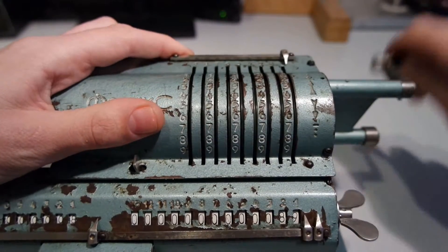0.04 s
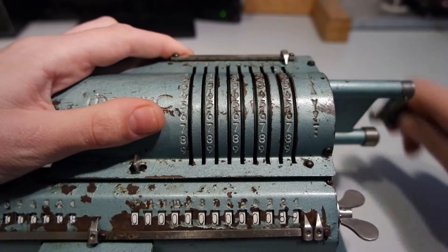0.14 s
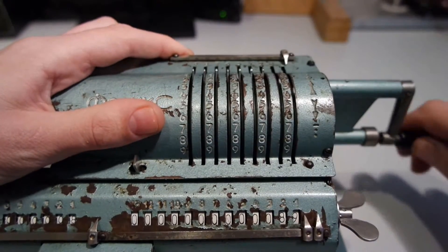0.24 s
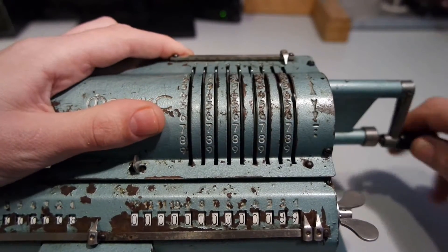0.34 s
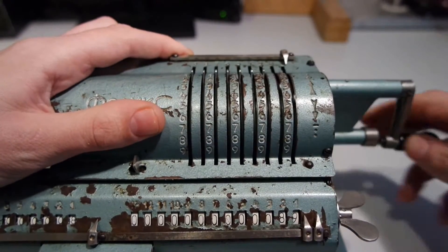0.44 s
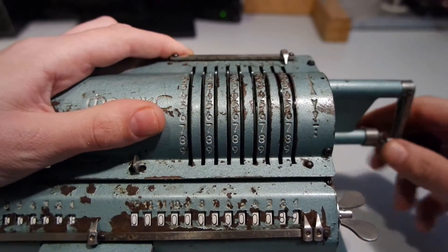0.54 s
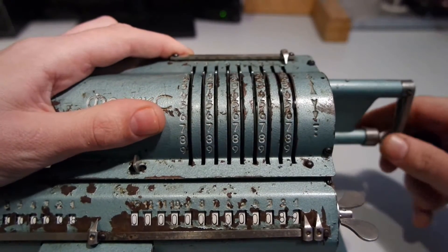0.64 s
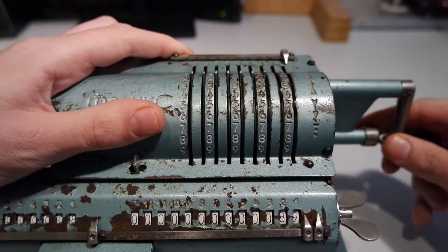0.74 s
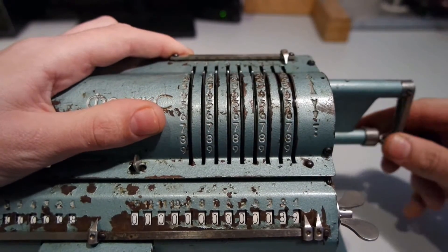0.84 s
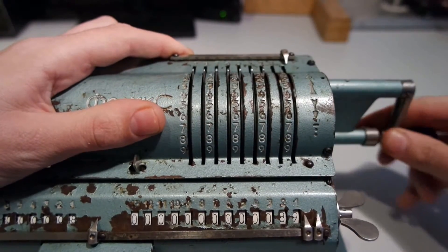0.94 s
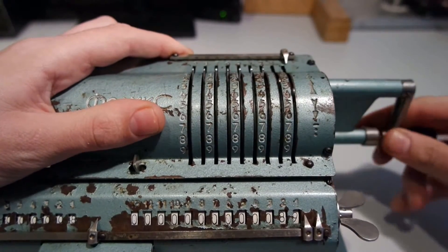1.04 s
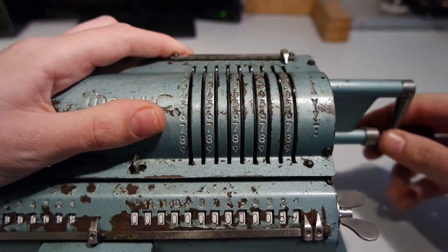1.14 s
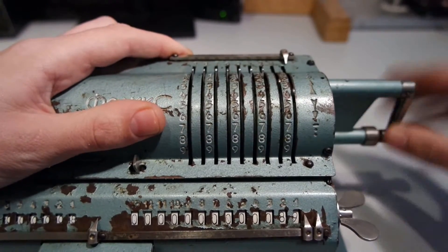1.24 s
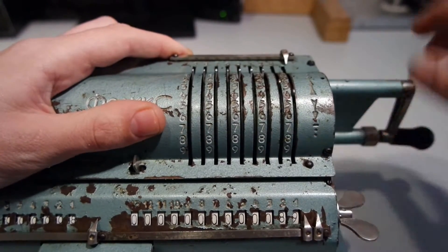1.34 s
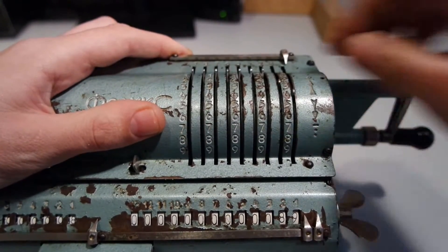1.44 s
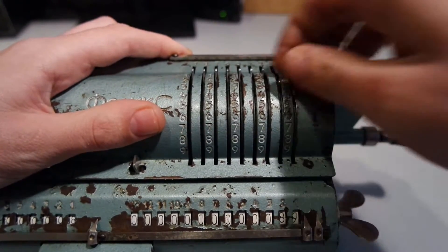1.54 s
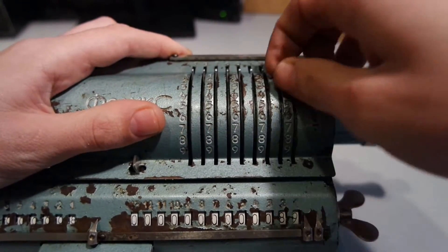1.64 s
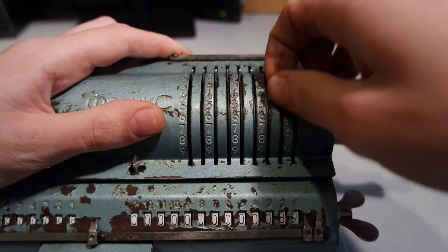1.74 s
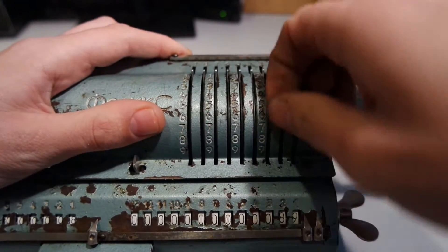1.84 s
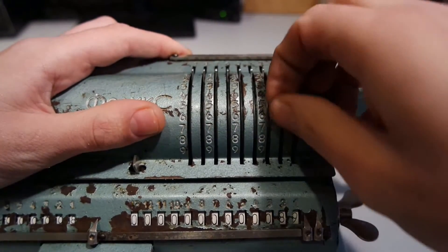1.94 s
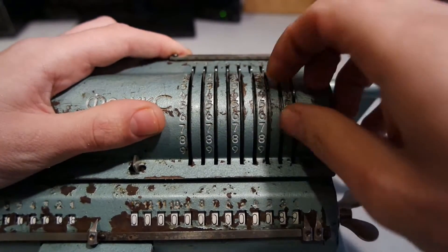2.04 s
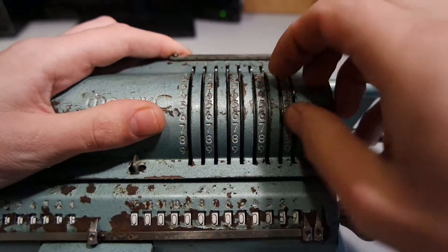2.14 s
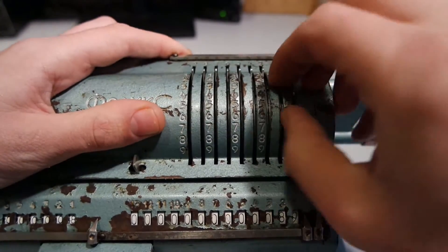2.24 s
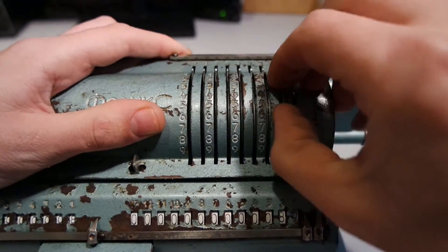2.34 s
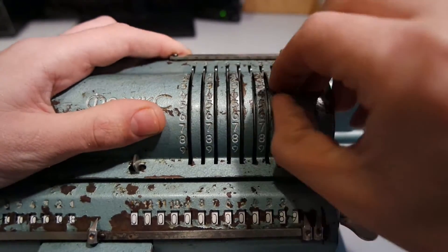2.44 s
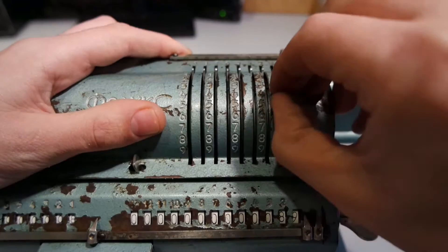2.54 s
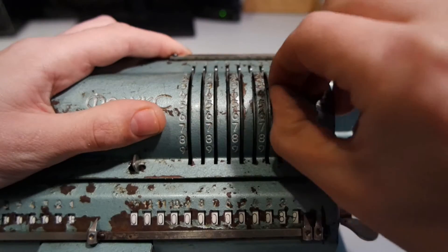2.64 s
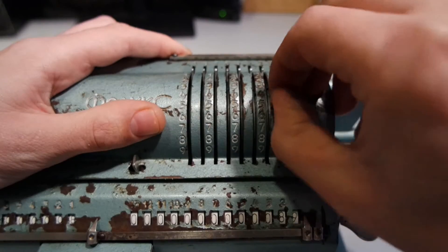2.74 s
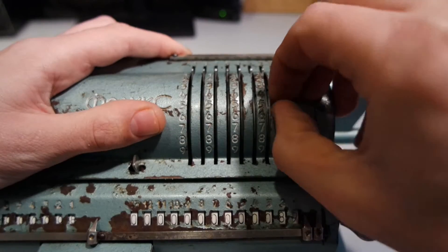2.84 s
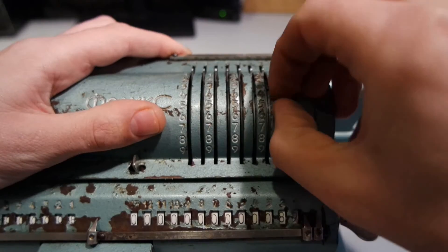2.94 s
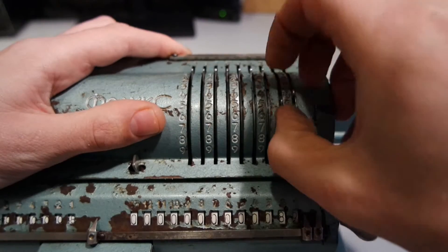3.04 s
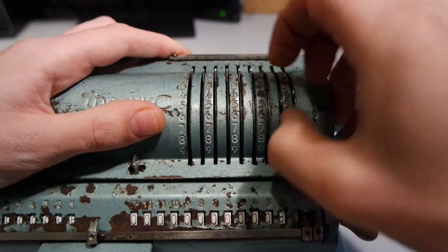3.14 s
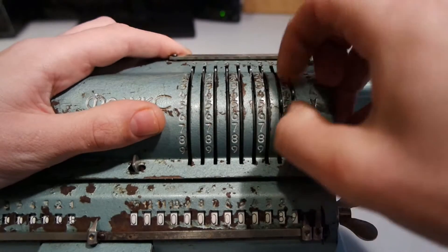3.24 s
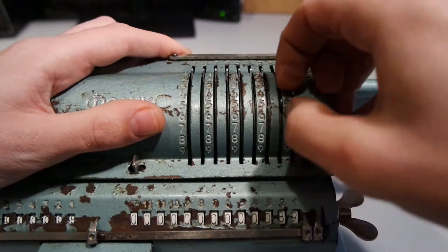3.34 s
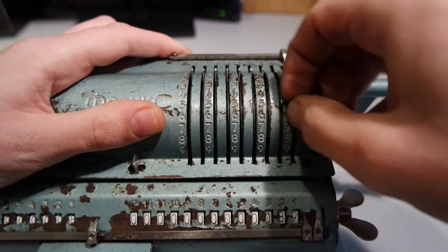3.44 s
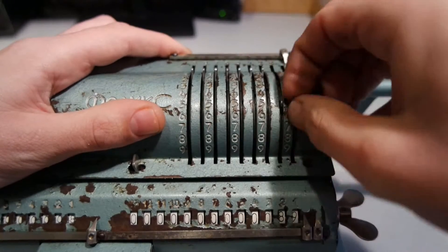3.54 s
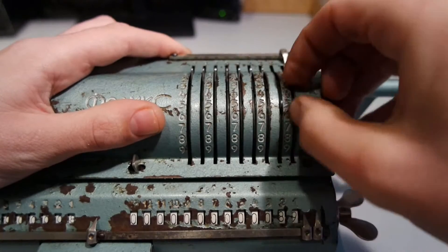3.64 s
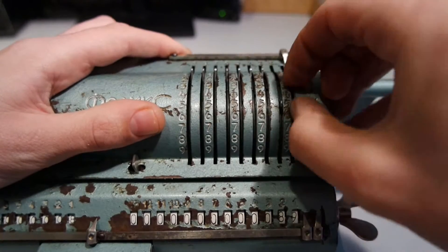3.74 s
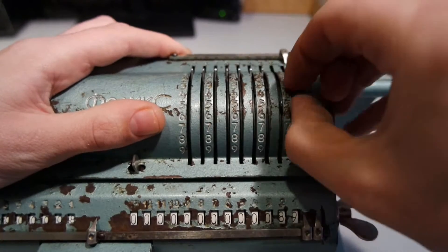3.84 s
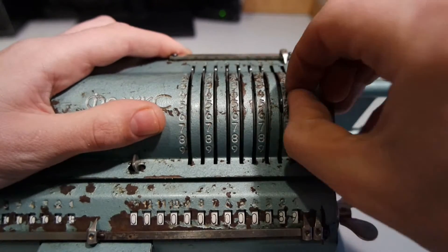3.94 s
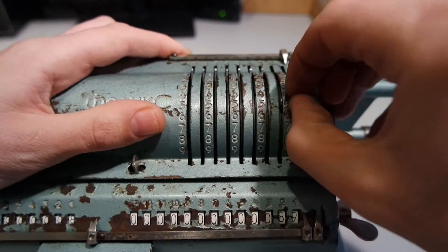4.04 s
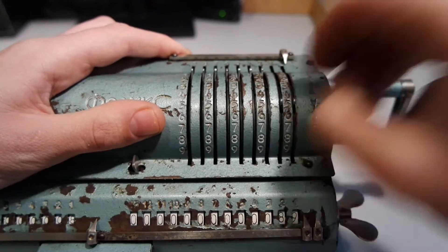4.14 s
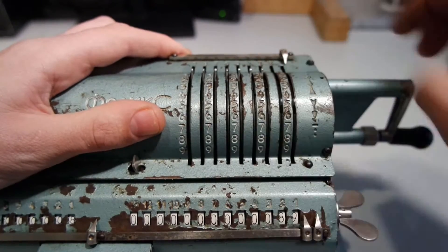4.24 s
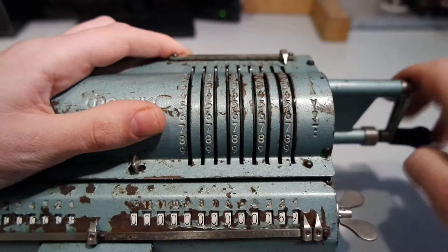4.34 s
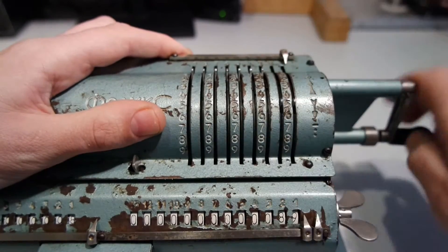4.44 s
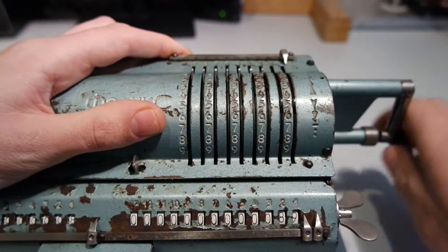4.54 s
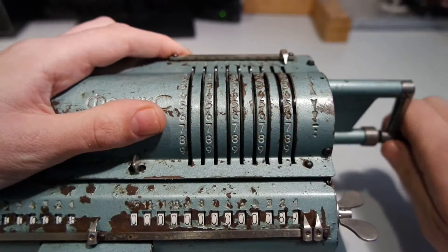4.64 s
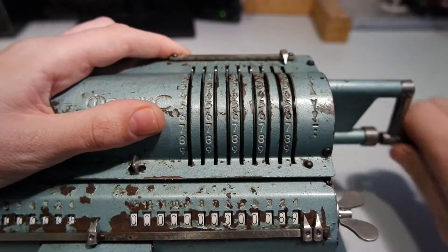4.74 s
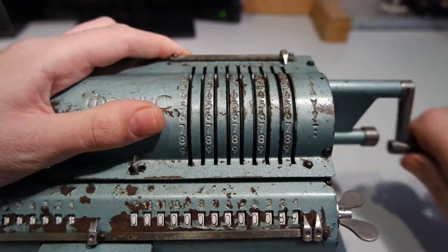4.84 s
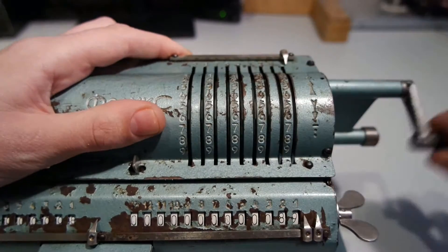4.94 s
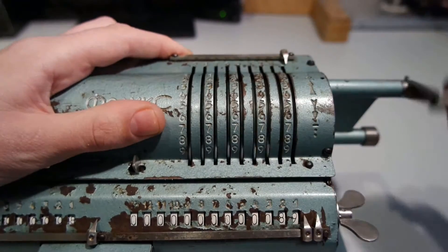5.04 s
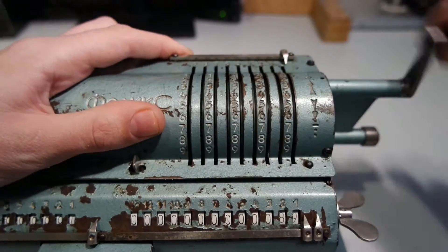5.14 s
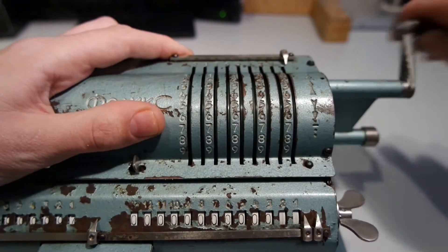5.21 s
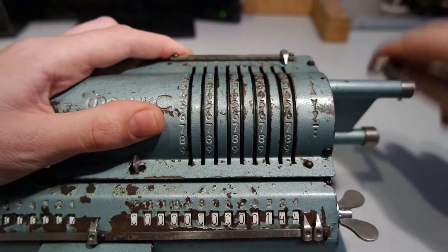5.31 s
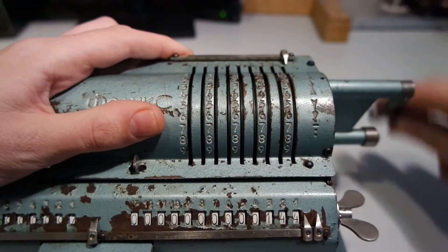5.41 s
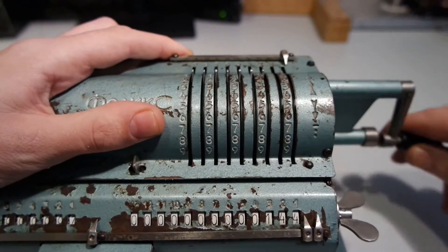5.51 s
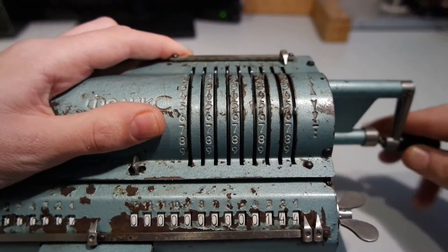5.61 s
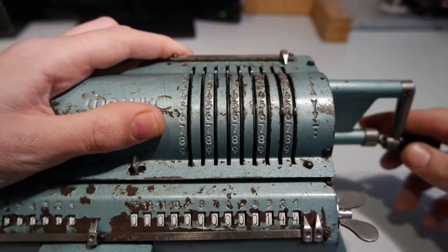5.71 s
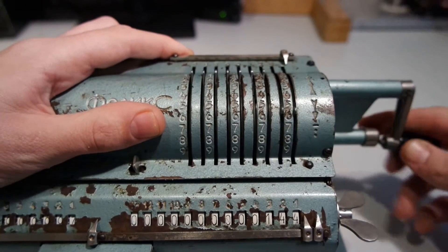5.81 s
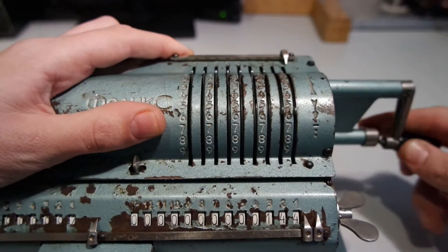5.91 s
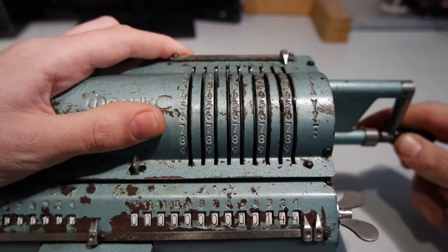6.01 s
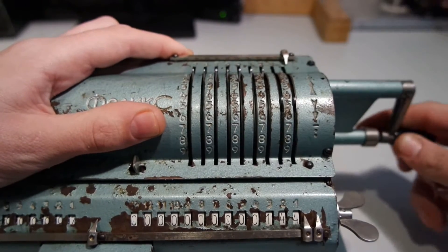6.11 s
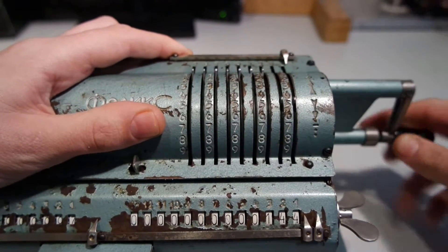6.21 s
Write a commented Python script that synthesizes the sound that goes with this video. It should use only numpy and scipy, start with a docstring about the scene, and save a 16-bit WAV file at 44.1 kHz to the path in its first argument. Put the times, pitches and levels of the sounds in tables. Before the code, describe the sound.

A hand-cranked metal calculator rattles in dense bursts of sharp ratchety snaps, with sparse faint lever clicks between, close up in a quiet room.

```python
"""A hand-cranked pinwheel calculator on a desk, close to a small microphone in a quiet room.
A dense flurry of snaps opens, a second follows at 1.05 s, then sparse, mostly faint clicks.
A hard snap lands at 4.48 s, the longest rattle runs from 5.29 s; a faint squeak and last snaps close.
Each snap is a noise chatter that rings casing modes, steel, tick and desk filters; pushes shake
the desk and noise grains rub throughout, over a thin whine, room tone and hiss."""
import sys
import numpy as np
from scipy import signal
from scipy.io import wavfile
from scipy.ndimage import uniform_filter1d

SR = 44100
rng = np.random.default_rng(int(sys.argv[2]) if len(sys.argv) > 2 else 0)


def unload_audio(sound):
    """Save the sound as a 16-bit wav file, at the path given as the first command line argument."""
    columns = np.transpose(np.atleast_2d(sound))
    # keep every value between -1 and 1, then stretch to whole-number steps
    steps = np.round(np.clip(columns, -1, 1) * 32767)
    wavfile.write(sys.argv[1], SR, steps.astype(np.int16))


N = 276507

# Mechanism snaps. Each row: start in seconds, then chatter levels over the first 10 ms, before filtering:
# high casing modes in dB, low casing modes in dB, steel in dB, bright tick in dB, desk knock in dB;
# pitch favoured among the casing modes in Hz, chatter time in ms before each part's stretch.
SNAPS = [(0.0095, -42, -46.5, -35.5, -46, -50.5, 3600, 3.5),
         (0.0132, -41, -51, -33.0, -30, -58, 3750.0, 3.2), (0.0635, -33, -40, -44, -33, -37, 2080, 4.1),
         (0.0808, -33, -48, -31.5, -23.5, -59, 3060, 3.3), (0.103, -34.5, -40, -33, -21, -46, 3020, 3.5),
         (0.1205, -32.5, -56.0, -33.0, -24, -54, 3060, 9.6),
         (0.1453, -33.5, -51, -32, -26.5, -58.5, 2130, 6.1),
         (0.2216, -58, -49, -67.5, -61, -52.0, 1090.0, 9.9),
         (0.2385, -48, -47, -53, -58.0, -47, 1000.0, 9.0),
         (0.2517, -48, -48.5, -62, -64.0, -50, 2060.0, 2.6),
         (0.2666, -53, -53, -52.5, -48.5, -50, 3900, 3.7), (0.437, -42, -55, -68, -38, -65, 2220, 4.9),
         (0.504, -74.5, -65, -65, -58, -60, 1280, 6.4), (0.6116, -47.5, -47.5, -57, -68, -52, 1800, 6),
         (0.637, -51.5, -53.5, -69, -78, -65, 1030, 3.3), (0.732, -59, -68, -76, -81, -75, 2160, 4),
         (0.7741, -66.0, -71, -60.5, -67, -70, 3730, 6.9), (1.054, -62, -64, -72.5, -74.0, -59.5, 2260, 12),
         (1.0808, -53.5, -54, -72, -54, -50.5, 2070, 3.8), (1.0885, -35, -38.5, -37, -35, -48, 2840, 3.2),
         (1.0976, -37.5, -41, -38.0, -27, -43.5, 2090, 3.4),
         (1.109, -48, -42, -57, -45.5, -55, 1870.0, 2.1), (1.1163, -63, -49, -63, -53, -49, 1960, 14),
         (1.1713, -46, -49, -38, -42, -60, 2800, 3.2), (1.177, -41.5, -57.5, -47, -36.5, -38, 2900, 3.1),
         (1.239, -53, -49.5, -67, -73, -67, 2090.0, 4.6),
         (1.2645, -57, -58.0, -68, -76.0, -69, 2820.0, 4.6),
         (1.3587, -61, -66.5, -59, -66, -74, 2020.0, 5.1),
         (1.4182, -72.0, -57, -68, -68, -57.5, 1170.0, 11),
         (1.436, -67.5, -63, -66, -61, -61.5, 1210.0, 8.3),
         (1.6615, -60.5, -76.5, -69, -64.5, -77, 2330.0, 4.6), (1.717, -76, -62, -79, -82, -71, 1040, 9.9),
         (1.846, -47.5, -42, -47, -52, -47.5, 980, 6.2),
         (1.905, -71, -64.0, -69.5, -66.0, -68, 1070.0, 8.1),
         (1.918, -62, -66.0, -68.5, -61.5, -66.5, 1090.0, 7.6),
         (1.9412, -63, -71, -65.0, -61, -71, 3850.0, 7.9),
         (1.9522, -62, -67.0, -69.5, -65, -68, 1060.0, 9.0),
         (1.9799, -62.5, -62, -65.5, -62, -69.5, 910.0, 4.4),
         (2.049, -61, -65, -55, -57.5, -64, 3470.0, 3.5), (2.0576, -77, -78.5, -63, -64, -71, 3440.0, 10),
         (2.5256, -50, -55, -58, -59.5, -52.5, 2790, 5.8),
         (2.8959, -69.5, -64.5, -82, -77, -67.5, 1040.0, 13),
         (2.912, -81.5, -79.0, -81.5, -85.5, -77, 980.0, 9.0),
         (2.9323, -76, -68.5, -84, -74, -87.5, 1070, 9.0),
         (3.335, -74, -91.5, -81.5, -81, -87, 3460.0, 7.9),
         (3.4105, -58.5, -54.5, -69, -68.0, -56, 996, 9.5),
         (3.4265, -63, -68, -87, -73.0, -70.5, 1010.0, 9.0),
         (3.4377, -71, -64, -86, -82.5, -63, 1060.0, 8.5),
         (3.5719, -54, -57.5, -58.5, -49.5, -67.5, 3520, 5.7), (3.744, -65, -65, -71, -75, -78.5, 987, 7.2),
         (4.0325, -64.5, -66.5, -57.5, -62, -74.5, 3800, 11),
         (4.051, -44, -44.5, -48, -47.5, -48.5, 2860, 7.1),
         (4.4766, -31, -35.5, -33, -38.5, -63, 2810, 5.9), (4.6568, -54.5, -61.5, -66, -74, -64, 2280, 6.4),
         (4.792, -68, -79, -70, -71.5, -79, 1940.0, 9.0), (4.8619, -43, -45, -46, -38.5, -47, 3740, 13),
         (4.8764, -40.5, -55, -43, -37, -55, 3440, 7), (5.025, -58.5, -98.0, -60, -62.5, -73, 2880, 9.7),
         (5.0725, -53, -60.5, -66, -72.5, -55, 2640, 2.8), (5.1165, -50, -61, -49, -44, -55.0, 3170, 2.2),
         (5.2374, -68.5, -72, -63, -51.5, -75.5, 900.0, 3.7),
         (5.2887, -35.5, -39.5, -33.5, -30.5, -50, 2070.0, 4.4),
         (5.316, -31.5, -30.5, -34, -31.5, -40.5, 1010, 6.4), (5.3275, -33.5, -51, -57, -47, -43, 2770, 2),
         (5.3363, -33, -46, -27.5, -21.5, -53, 3160, 5.7), (5.3521, -38, -44, -34, -26.5, -49, 3020, 9.7),
         (5.3684, -37.0, -41, -32, -24, -40.5, 3130.0, 4.4),
         (5.3841, -33.5, -49.0, -31.5, -24, -54.0, 2760, 5.6),
         (5.4056, -35, -43, -36, -26.5, -43.5, 3570.0, 5.8),
         (5.4232, -39, -44, -35.5, -29.5, -44.5, 2830, 7),
         (5.4432, -41, -47.5, -37, -30.0, -67, 1370.0, 7.1),
         (5.5094, -47.5, -51.5, -53, -56.5, -47, 1030.0, 5.2),
         (5.539, -47.5, -54, -51, -41.5, -60, 3530.0, 5.8),
         (5.5499, -43, -49.5, -49, -44.5, -42, 3920, 2.3),
         (5.7144, -45.5, -57.5, -56, -43.5, -70, 2870, 3.3), (6.0748, -67, -63, -83, -84, -75, 2850.0, 6.1),
         (6.092, -54.5, -59, -67, -73, -53.5, 2780.0, 3.5), (6.1, -52, -53, -49.5, -51.0, -58, 1050, 9.3),
         (6.137, -53, -62, -65, -48, -71, 2900, 6.7), (6.1486, -32.5, -43.5, -39.5, -36, -63, 2850, 3.6),
         (6.199, -41, -56, -32.5, -23.5, -49.5, 4400, 4.1),
         (6.2042, -36, -52, -35, -26, -66.0, 4340.0, 3.8)]
USUAL_CHATTER_MS = 4
SOFTER_DB_PER_DOUBLING = 7.5  # the first blow weakens as the chatter time doubles
RISE_SHARE = 0.097  # build-up time constant / chatter time


def chatter(lumps, levels_db, stretch, lump_db, blow_db):
    """One sharp blow and a clump of tiny impacts that thins out, then a weak buzz of loose parts."""
    t = np.arange(4000) / SR
    out = np.zeros(N + 4000)
    lump_growth = 1.5 - np.exp(-t / 0.0018)
    grains = rng.standard_normal(lumps.shape) * gain_of(lump_db * lumps * lump_growth)
    for row, level_db, grain in zip(SNAPS, levels_db, grains):
        start_s, chatter_ms = row[0], row[-1]
        attack = gain_of(-5.5) * np.exp(-t / 0.00056)
        clump = np.exp(-t * 1000 / (stretch * chatter_ms))
        buzz = gain_of(-15.5) * np.exp(-t / 0.026)
        rise = 1 - np.exp(-t * 1000 / (RISE_SHARE * chatter_ms))
        burst = grain * (attack + clump + buzz) * rise
        softer_db = SOFTER_DB_PER_DOUBLING * np.log2(chatter_ms / USUAL_CHATTER_MS)
        burst[20] += gain_of(blow_db - softer_db) * np.sign(grain[0])
        first_10_ms = burst[:SR // 100]
        out[round(start_s * SR):][:4000] += gain_of(level_db) * burst / np.std(first_10_ms)
    return out[:N]


def ring(hz, t60_s):
    """Decaying sine of one casing mode, unit energy."""
    t = np.arange(6000) / SR
    taps = gain_of(-60 * t / t60_s) * np.sin(2 * np.pi * hz * t)
    return taps / np.linalg.norm(taps)


# Casing modes. Each row: pitch in Hz, relative level in dB, T60 in seconds.
CASING_MODES = [(986, 8, 0.028), (1039, 3.5, 0.058), (1390, 7, 0.065), (1745, 8.5, 0.025),
                (1800, 2.5, 0.031), (2053, -2, 0.036), (2190, -3.5, 0.019), (2340, -0.5, .03),
                (2807, -1, 0.036), (2916, 1, 0.01), (3161, -4.5, .035), (3456, -3, 0.032),
                (3694, -2, 0.018), (3940, -2, .03), (4380, -3.5, 0.011)]
LOW_HIGH_SPLIT_HZ = 1900
FAVOUR_DB, FAVOUR_WIDTH = 10, .07  # lift near the favoured pitch, reach as a share of pitch
RING_ON_DB = 1.5  # the casing rings on past the first 10 ms


def casing(lumps):
    """The place of the blow decides which modes answer; they share out the level of their group."""
    _, high_db, low_db, _, _, _, favoured_hz, _ = np.transpose(SNAPS)
    hz, mode_db, t60_s = np.transpose(CASING_MODES)
    detune = np.log(favoured_hz / hz[:, None])
    lift_db = FAVOUR_DB * np.exp(-(detune / FAVOUR_WIDTH) ** 2)
    power = gain_of(mode_db[:, None] + lift_db) ** 2
    low = hz < LOW_HIGH_SPLIT_HZ
    out = np.zeros(N)
    for group, group_db in ((low, low_db), (~low, high_db)):
        shares = power[group] / power[group].sum(0)
        for mode_hz, mode_t60_s, share in zip(hz[group], t60_s[group], shares):
            level_db = group_db + RING_ON_DB + 10 * np.log10(share)
            drive = chatter(lumps, level_db, stretch=0.7, lump_db=2.5, blow_db=20)
            out += through(drive, ring(mode_hz, mode_t60_s))
    # the casing sounds nothing below about 700 Hz
    return signal.sosfilt(signal.butter(3, 700, "high", fs=SR, output="sos"), out)


# Spectra of steel chatter, bright tick and desk knock. Each row: frequency in Hz, relative density in dB per Hz.
STEEL_SPECTRUM = [(4200, -6.5), (5000, -3.5), (6500, -4.5), (8000, -5), (9000, -5)]
TICK_SPECTRUM = [(7800, -15.5), (9170, -4), (10300, -5), (11600, -1.5), (13000, 1), (14400, -3.5),
                 (15500, -6)]
KNOCK_SPECTRUM = [(150, -30), (250, -17), (320, -13), (385, 2.5), (470, -8), (600, 1.5), (900, -22)]


def snaps():
    """The chatter rings the casing, rattles the steel, ticks brightly and knocks the desk."""
    _, _, _, steel_db, tick_db, knock_db, _, _ = np.transpose(SNAPS)
    # rebounds, felt by every part
    lumps = evened(uniform_filter1d(rng.standard_normal((len(SNAPS), 4000)), 35, axis=1))
    steel = chatter(lumps, steel_db, stretch=0.93, lump_db=-2, blow_db=8.5)
    tick = chatter(lumps, tick_db, stretch=1.5, lump_db=3.0, blow_db=14)
    knock = chatter(lumps, knock_db, stretch=1.5, lump_db=2.0, blow_db=13.5)
    out = casing(lumps)
    out += through(steel, colour(STEEL_SPECTRUM))
    out += through(tick, colour(TICK_SPECTRUM))
    return out + through(knock, colour(KNOCK_SPECTRUM))


def swells(times_s, levels_db, rise_s, fall_db_per_s):
    """Level curve: each event climbs 20 dB in rise_s, then falls steadily in dB; powers add."""
    step_s = np.arange(0, N / SR, .002)
    since_s = step_s - np.asarray(times_s)[:, None]
    drop_db = np.where(since_s < 0, -since_s * 20 / rise_s, since_s * fall_db_per_s)
    db = np.asarray(levels_db)[:, None] - drop_db
    return np.interp(np.arange(N) / SR, step_s, np.sqrt((gain_of(db) ** 2).sum(0)))


# Pushes of the hands on the machine. Each row: peak time in seconds, desk shake in dB, desk rustle in dB.
HAND_PUSHES = [(0, -44, -53), (0.088, -34.5, -39.5), (.13, -44, -42.5), (.2, -50, -53), (0.259, -43.5, -54),
               (.33, -51, -66), (0.421, -47.5, -54.5), (0.628, -50.5, -50.5), (.72, -58, -67),
               (1.098, -36.5, -48), (1.168, -40, -35), (1.23, -38, -48), (1.312, -44, -61),
               (1.37, -48.5, -57.5), (1.44, -59, -59), (1.68, -60.5, -74), (1.85, -52, -55.5),
               (1.94, -50.5, -76), (2.53, -65, -60.5), (2.64, -65, -67), (2.74, -76, -64.5),
               (2.969, -68.5, -74.5), (3.42, -61.5, -66.5), (3.58, -50.5, -56), (4.05, -54, -58.5),
               (4.36, -86, -66), (4.5, -44, -55.5), (4.57, -52.5, -62), (4.66, -60, -71),
               (4.872, -35, -47.5), (4.97, -42, -52.5), (5.111, -49, -49.5), (5.22, -42.5, -55),
               (5.322, -35.5, -34.5), (5.39, -40, -40.5), (5.46, -46, -51), (5.538, -43.5, -50.5),
               (5.64, -47.5, -78), (5.73, -48.5, -55.5), (5.82, -57.5, -60), (6.151, -39.5, -49.5),
               (6.2, -65, -58)]
# Fingers rubbing on the casing. Each row: time in seconds, reference level in dB.
FINGER_GRIP = [(0.0, -58), (0.12, -55), (0.24, -57.5), (0.89, -68), (1.1, -68), (1.24, -54), (1.5, -67.5),
               (1.92, -58.5), (2.29, -75.5), (4.47, -96), (4.64, -64), (5.32, -72.5), (5.43, -59),
               (5.73, -68), (6.13, -62.5), (6.27, -80)]
PUSH_RISE_S, SHAKE_FALL_DB_PER_S, RUSTLE_FALL_DB_PER_S = .02, 167, 159
REST_SHAKE_DB, REST_RUSTLE_DB, REST_RUB_DB = -15, -3, -2.5  # relative to the grip level
LOOSE_DB, LOOSE_FALL_DB_PER_S = -10.5, 170  # rub after each snap, relative to its high casing level


def hand_levels():
    """Shake and rustle swell with each push; rubbing follows the fingers and lingers after each snap."""
    push_s, shake_db, rustle_db = np.transpose(HAND_PUSHES)
    snap_s, high_db = np.transpose(SNAPS)[:2]
    grip = gain_of(np.interp(np.arange(N) / SR, *np.transpose(FINGER_GRIP)))
    shake = swells(push_s, shake_db, PUSH_RISE_S, SHAKE_FALL_DB_PER_S)
    rustle = swells(push_s, rustle_db, PUSH_RISE_S, RUSTLE_FALL_DB_PER_S)
    rub = swells(snap_s + .008, high_db + LOOSE_DB, .008, LOOSE_FALL_DB_PER_S)
    return (np.hypot(shake, grip * gain_of(REST_SHAKE_DB)),
            np.hypot(rustle, grip * gain_of(REST_RUSTLE_DB)),
            np.hypot(rub, grip * gain_of(REST_RUB_DB)))


# Low desk modes. Each row: pitch in Hz, bandwidth in Hz, relative level in dB.
DESK_MODES = [(67.8, 22, -2), (98.7, 6.5, -2), (111.7, 6.8, -2.5), (140, 16, -6.5)]
# Heavier jolts passed into the desk. Each row: start in seconds, drive level in dB.
JOLTS = [(0.081, -33), (0.61, -42), (1.095, -53), (1.162, -41), (3.573, -44.5), (4.484, -40), (4.876, -26),
         (5.212, -43), (5.316, -29.5)]
# Desk rustle and rubbing spectra. Each row: frequency in Hz, relative density in dB per Hz.
RUSTLE_SPECTRUM = [(130, -14.5), (170, -1), (197, 1), (220, -6), (250, -1), (310, -9), (390, -7),
                   (600, -13), (1200, -19.5)]
RUB_SPECTRUM = [(400, -18), (1000, -2.5), (3000, -3), (6000, -10), (9000, -11.5), (13000, -10.5),
                (15500, -21)]


def hands():
    """Uneven pushes excite the low desk modes; skin and gears rub in small grains."""
    shake, rustle, rub = hand_levels()
    t = np.arange(6000) / SR
    desk = sum(gain_of(db) * np.exp(-np.pi * width_hz * t) * np.sin(2 * np.pi * hz * t)
               for hz, width_hz, db in DESK_MODES)
    push, brush, grain, lumps = rng.standard_normal((4, N))
    grain = grain * gain_of(2.1 * evened(uniform_filter1d(lumps, 90)))
    thud = shake * evened(through(push, desk))
    jolts = np.zeros(N)
    for start_s, db in JOLTS:
        jolts[round(start_s * SR)] = gain_of(db)
    # a short push, then the modes ring on
    thud += through(jolts, desk / desk.max() * (np.exp(-t / .012) + 0.083))
    # the desk shake carries little below about 42 Hz
    thud = signal.sosfilt(signal.butter(2, 42, "high", fs=SR, output="sos"), thud)
    rustling = rustle * evened(through(brush, colour(RUSTLE_SPECTRUM)))
    rubbing = rub * evened(through(grain, colour(RUB_SPECTRUM)))
    return thud + rustling + rubbing


# Faint squeak. Each row: time in seconds, pitch in Hz, level in dB before blurring.
SQUEAK_TRACK = [(5.75, 1360, -88), (5.85, 1350, -68.5), (6.03, 1390, -69), (6.16, 1360, -78)]
WHINE_HZ, WHINE_PEAK_DB = 8120, -86


def tones():
    """A noise-blurred squeak as the crank comes round, and a thin whine that wavers by a few Hz."""
    s, hz, db = np.transpose(SQUEAK_TRACK)
    t = np.arange(N) / SR
    slow = uniform_filter1d(rng.standard_normal((2, N)), 170, axis=1)
    blur, waver = evened(uniform_filter1d(slow, 170, axis=1))
    squeak_level = gain_of(np.interp(t, s, db, -130, -130))
    squeak = squeak_level * blur * np.sin(2 * np.pi * np.cumsum(np.interp(t, s, hz)) / SR)
    whine = np.sin(2 * np.pi * np.cumsum(WHINE_HZ + 4 * waver) / SR)
    return squeak + gain_of(WHINE_PEAK_DB) * whine


# Room decay. Each row: frequency in Hz, T60 in seconds.
ROOM_DECAY = [(300, 0.39), (1500, 0.16), (4000, 0.18), (8000, 0.17), (13000, 0.18)]


def room(x):
    """Sparse reflections of random sign after a short gap, each band dying at its own speed."""
    taps = np.zeros(SR // 2)
    slots = np.arange(200, len(taps) - 20, 20)
    taps[slots + rng.integers(0, 20, len(slots))] = rng.choice([-1., 1.], len(slots))
    hz, t, z = signal.stft(taps, SR, nperseg=256)
    decay = gain_of(-60 * t / read(ROOM_DECAY, hz)[:, None])
    tail = signal.istft(z * decay, SR, nperseg=256)[1]
    return through(x, tail / np.linalg.norm(tail))


# Background spectrum. Each row: frequency in Hz, relative density in dB per Hz.
HUSH_SPECTRUM = [(12, -33), (20, 2.5), (59, -5.5), (124, -8), (256, -19.5), (294, -14), (603, -14),
                 (674, -13.5), (2160, -20.5), (2340, -20), (5850, -27), (9630, -28.5), (15000, -34.5)]
HUSH_RMS_DB = -68


def hush():
    """Room tone and microphone hiss: shaped noise, slightly patchy in time and frequency."""
    hz = np.fft.rfftfreq(1024, 1 / SR)
    a, b, patches = rng.standard_normal((N // 256 + 5, 513, 3)).T
    patches = evened(uniform_filter1d(uniform_filter1d(patches, 14, axis=0), 8, axis=1))
    z = (a + 1j * b) * gain_of(read(HUSH_SPECTRUM, hz)[:, None] + 2.5 * patches)
    noise = signal.istft(z, nperseg=1024, noverlap=768)[1][:N]
    return gain_of(HUSH_RMS_DB) * evened(noise)


def gain_of(db):
    """Decibels to amplitude."""
    return 10 ** (np.asarray(db) / 20)


def evened(x):
    """Scales to rms 1."""
    return x / np.sqrt(np.mean(x ** 2) + 1e-20)


def read(points, hz):
    """Value of a table on a log-frequency axis."""
    f, value = np.transpose(points)
    return np.interp(np.log(hz + 1), np.log(f + 1), value)


def colour(points):
    """Minimum-phase response of unit energy with the given spectrum, 30 dB per octave skirts outside it."""
    hz = abs(np.fft.fftfreq(8192, 1 / SR))
    octaves_below = np.log2((points[0][0] + 1) / (hz + 1))
    octaves_above = np.log2((hz + 1) / points[-1][0])
    beyond = np.maximum(octaves_below, octaves_above).clip(0)
    log_gain = np.log(gain_of(np.maximum(read(points, hz) - 30 * beyond, -80)))
    min_phase = -signal.hilbert(log_gain).imag
    taps = np.fft.ifft(np.exp(log_gain + 1j * min_phase)).real[:4096]
    return taps / np.linalg.norm(taps)


def through(x, taps):
    """Convolution cut to length."""
    return signal.oaconvolve(x, taps)[:N]


def scene():
    """Machine with its room reflections, hands, tones and background."""
    machine = snaps()
    return (machine + gain_of(-10.0) * room(machine) + hands() + tones() + hush())[None]


ROLL_HZ, EDGE_HZ = 15250, 16800


def record(dry):
    """The treble rolls off fast near the top; then the band limit."""
    roll_points_hz = [0, ROLL_HZ - 500, ROLL_HZ + 150, SR / 2]
    roll = signal.firwin2(255, roll_points_hz, gain_of([-1.5, 1, -38.5, -46.5]), fs=SR)
    edge = signal.firwin(511, EDGE_HZ, window=("kaiser", 9), fs=SR)
    return signal.oaconvolve(dry, np.convolve(roll, edge)[None], "same")


dry = scene()
out = record(dry)
unload_audio(out)
```